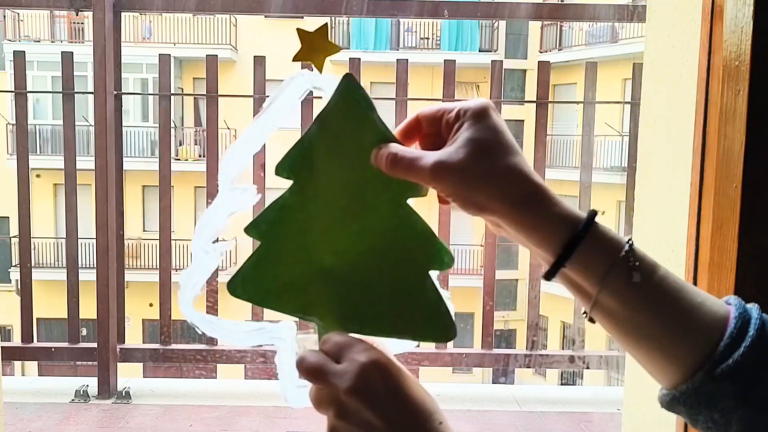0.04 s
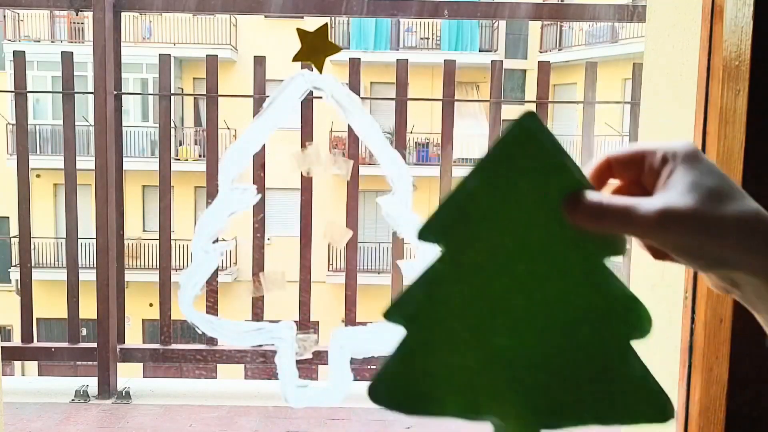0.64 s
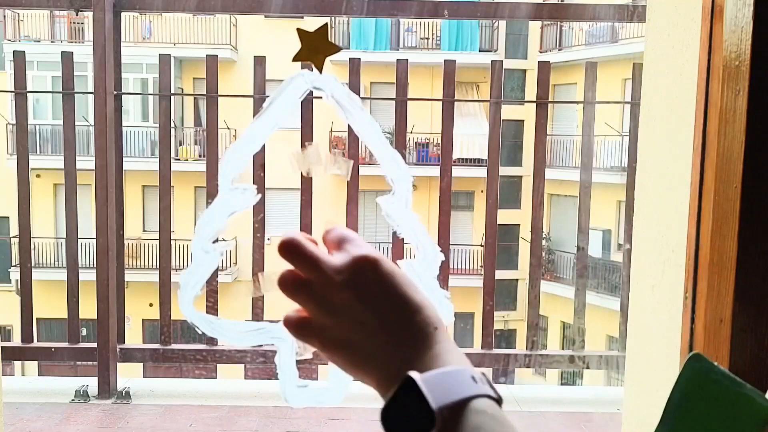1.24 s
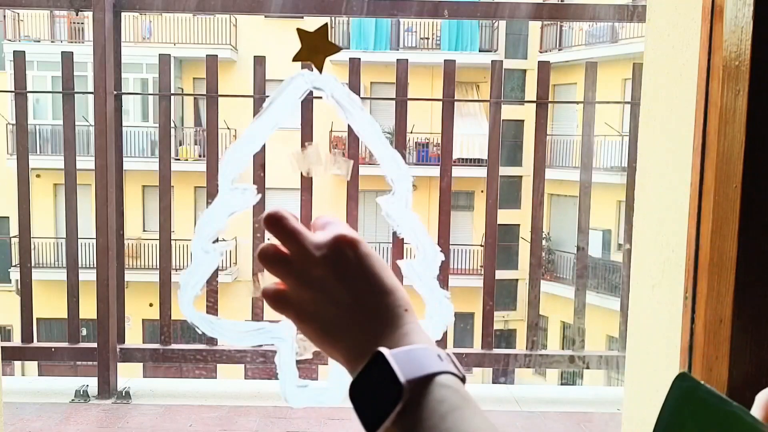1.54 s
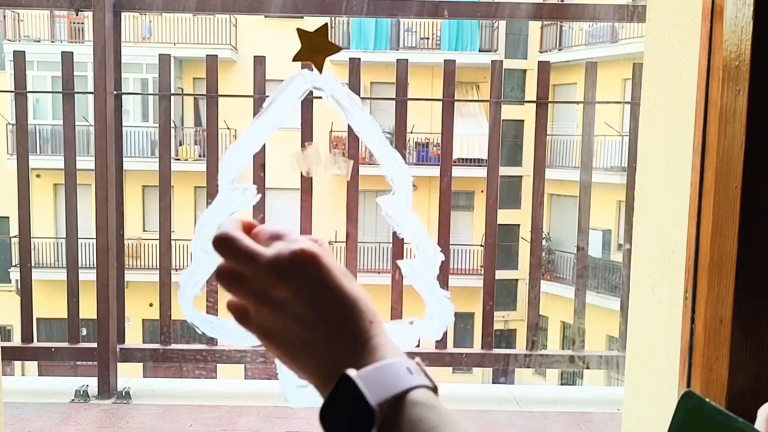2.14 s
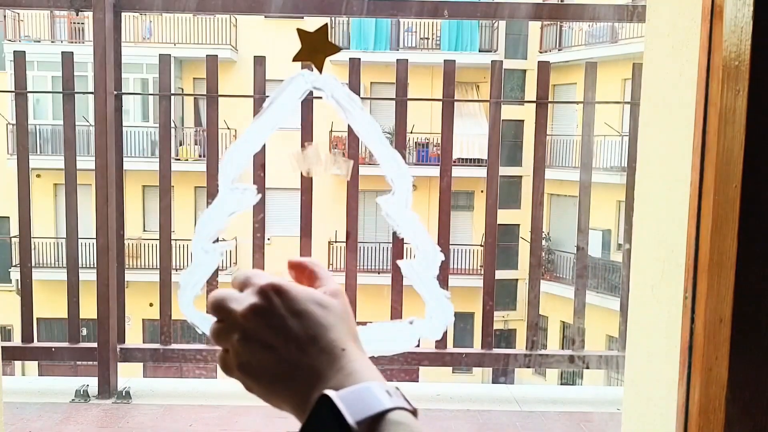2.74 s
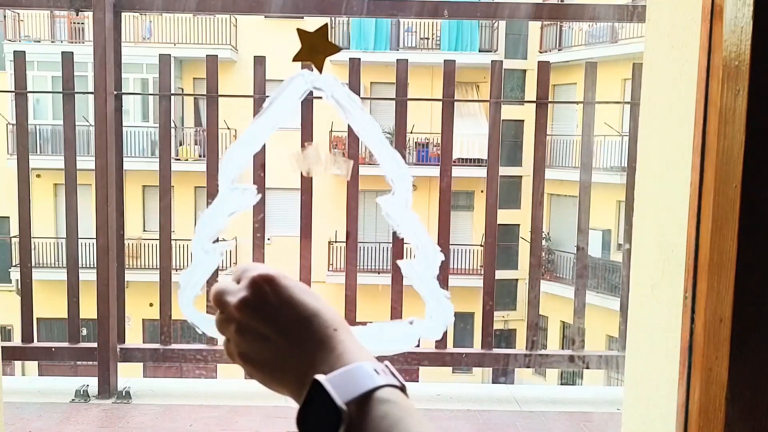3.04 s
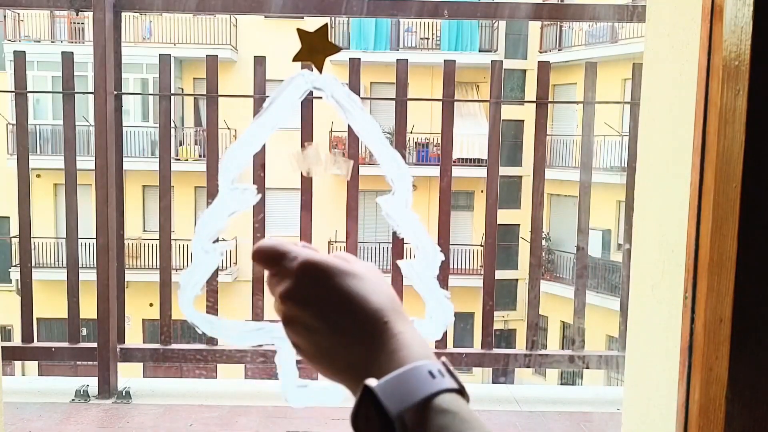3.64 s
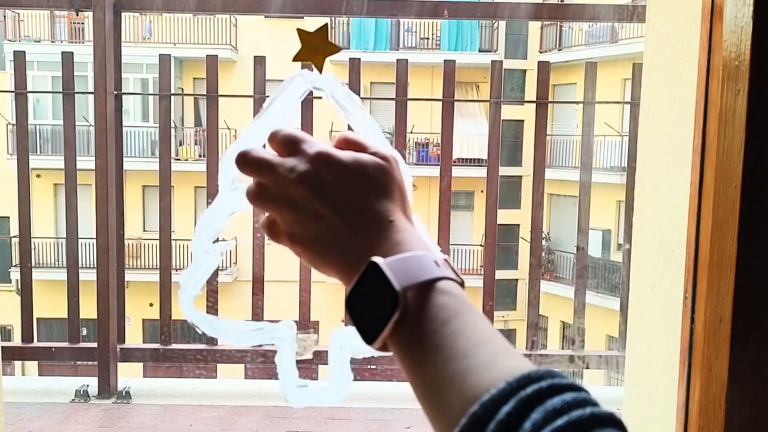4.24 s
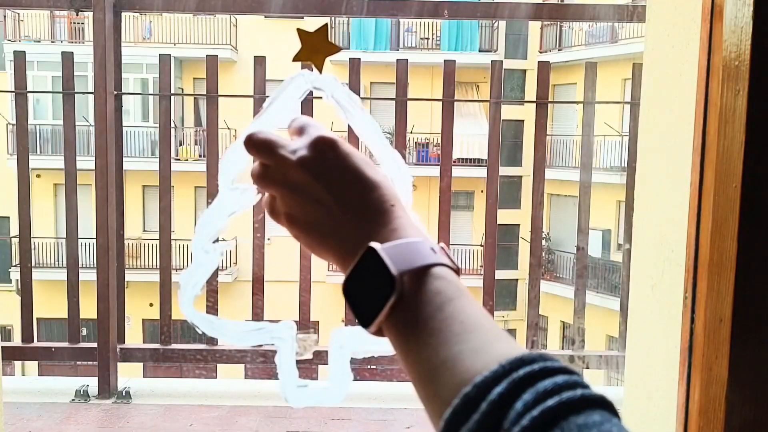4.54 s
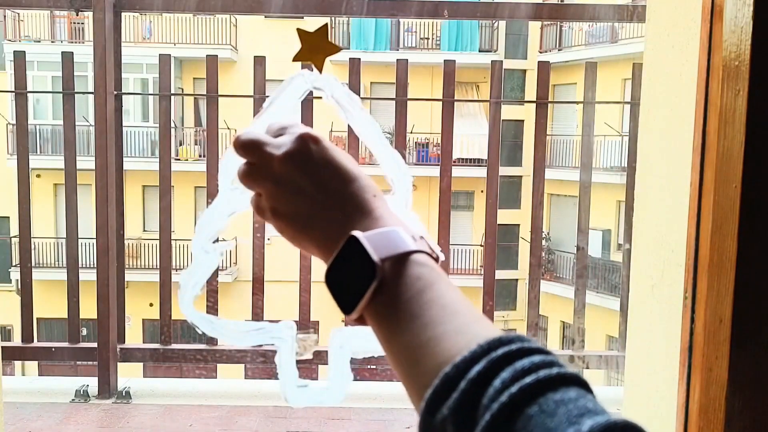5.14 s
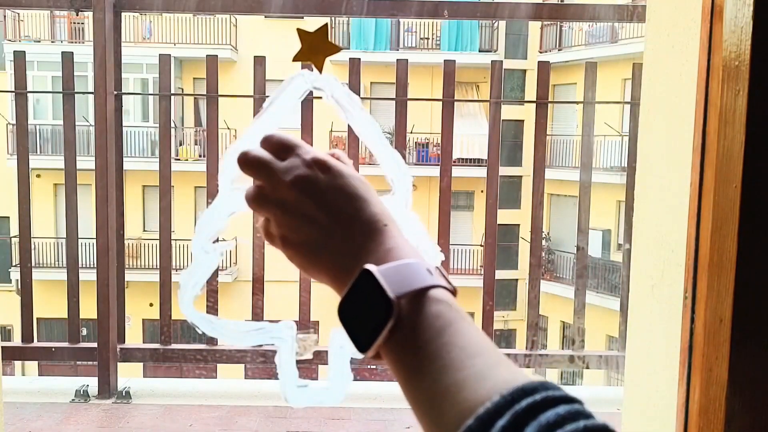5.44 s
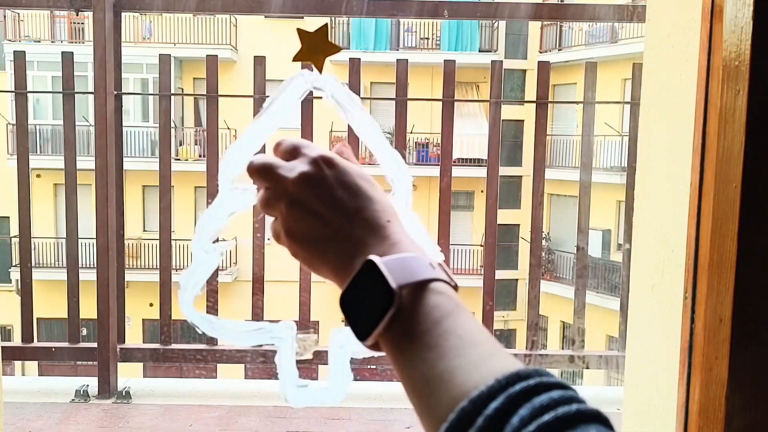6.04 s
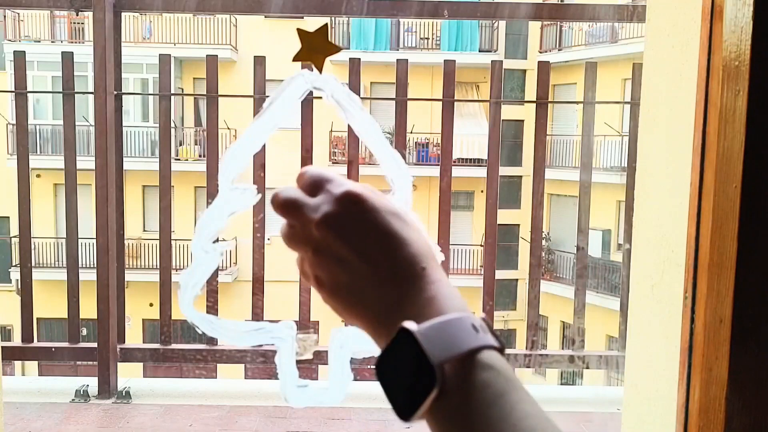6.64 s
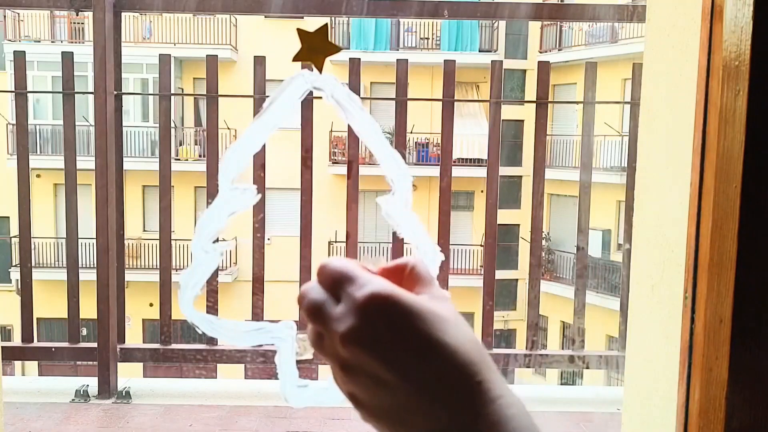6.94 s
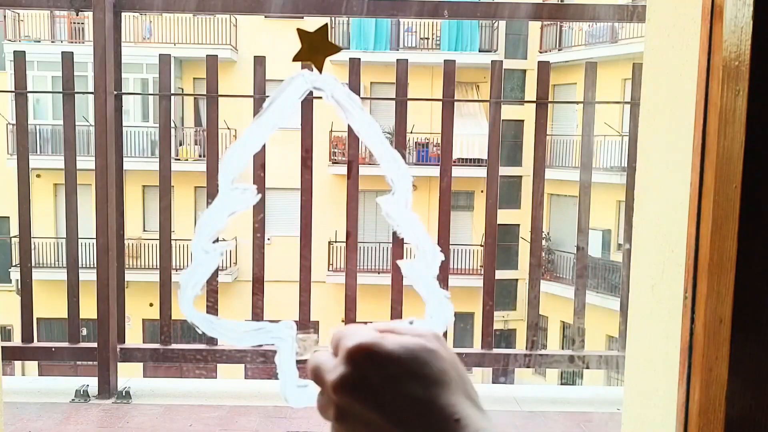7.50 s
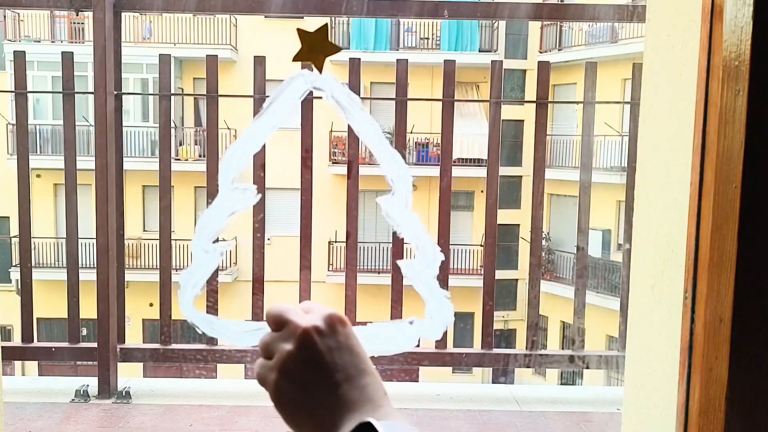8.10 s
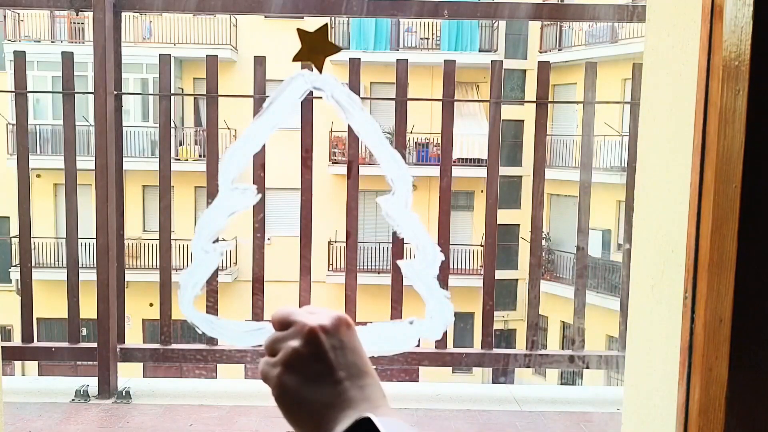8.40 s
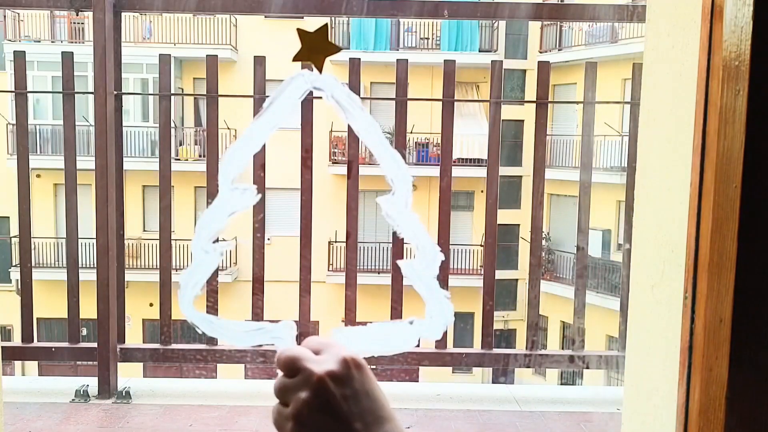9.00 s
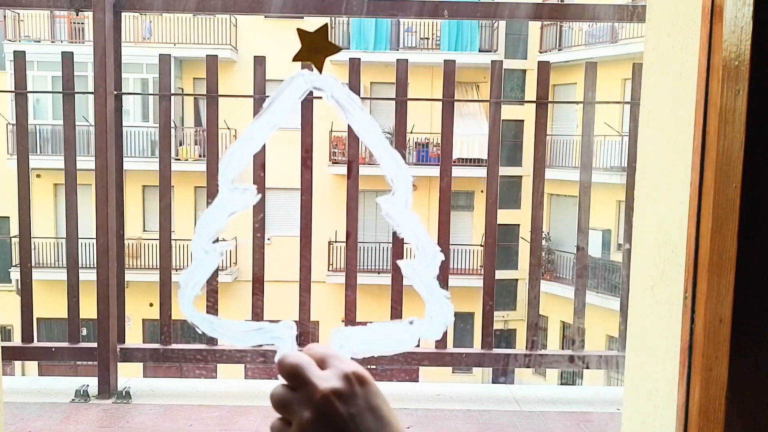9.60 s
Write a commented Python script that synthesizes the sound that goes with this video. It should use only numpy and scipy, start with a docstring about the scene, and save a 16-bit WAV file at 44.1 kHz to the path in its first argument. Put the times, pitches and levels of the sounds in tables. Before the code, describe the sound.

Sticky tape peeled off a window pane in short crackling rips that make the glass boom, with light crinkling in between.

```python
"""Sticky tape is peeled, strip by strip, off a large window pane where it held a paper cut-out.
The glue yields by stick-slip, in tiny slips and sharp pops that radiate from the taut tape as a hiss
and drive the bending modes of the glass, which boom for about a second. Between pulls a fingernail
buckles the next strip, loose tape crinkles, a fingertip judders and the cut-out is put aside.
A bare room reverberates over a faint hush."""
import sys
import numpy as np
from scipy import signal
from scipy.fft import rfft, irfft
from scipy.io import wavfile
from scipy.ndimage import uniform_filter1d

SR = 44100
rng = np.random.default_rng(int(sys.argv[2]) if len(sys.argv) > 2 else 0)


def unload_wav(signal):
    """Save mono or channel-first audio to the path in sys.argv[1] as 16-bit WAV at rate SR, clipped to [-1, 1]."""
    wavfile.write(
        sys.argv[1],
        SR,
        np.round(np.clip(np.atleast_2d(signal).T, -1, 1) * 32767).astype(np.int16),
    )


N = 430416
TIME = np.arange(N) / SR

# stretches of pulling on a strip: start_s, rise_s, hold_s, force_db, bright_share_db, rasp_db
PEEL_STROKES = [(0, 0.001, 0.034, -38.5, 15, -30.5), (.06, 0.028, 0.4, -52.5, 1, -49),
                (0.325, 0.018, 0.19, -28.5, -39, -68), (2.046, 0.0022, 0.082, -43.5, -29, -66),
                (2.172, 0.0035, 0.056, -20, -2, -37.5), (2.229, 0.012, 0.053, -19.5, -1, -54),
                (2.317, 0.018, 0.24, -25.5, -16.5, -49.5), (3.213, 0.044, 0.018, -34.5, 1, -29.5),
                (3.253, .1, 0.25, -33, -25, -58.5), (5.174, 0.064, 0.036, -37, -7, -24.5),
                (5.354, 0.0027, 0.049, -27, -3.5, -22.5), (5.412, 0.04, 0.3, -33.5, -18, -41),
                (6.376, 0.17, 0.13, -41, -31, -80), (6.557, 0.037, 0.0088, -24, -16.5, -40),
                (6.639, 0.036, 0.0075, -25, -42, -78), (8.575, .015, 0.045, -46, -10, -32),
                (8.632, 0.0035, 0.12, -32, -5, -27.5), (8.761, 0.033, .1, -28, 3, -24.5),
                (8.902, 0.021, .02, -17.5, -4, -41.5), (8.96, 0.02, 0.14, -29.5, -20, -47)]
# glue letting go in one pop: start_s, level_db, body_share_db
GLUE_POPS = [(0.0533, -23.5, -5.5), (0.0803, -19, -7.5), (0.1291, -16.5, -13.5), (0.214, -25, -6),
             (0.2608, -24.5, -4), (0.2998, -25, -7.5), (0.3401, -30, -10), (0.3444, -24.5, -6),
             (1.7462, -49.5, -17.5), (2.0382, -34, -8.5), (2.1768, -26, -2), (2.583, -39, -18),
             (2.7892, -34, -5), (2.9711, -38.5, -7.5), (3.196, -36, -20), (3.2166, -28, -25),
             (3.3947, -30, -22), (3.7703, -31.5, -15), (4.3508, -29.5, -15.5), (5.1334, -35.5, -27),
             (5.1956, -28.5, -32), (5.2309, -24, -28), (5.3543, -21.5, -6), (5.5872, -31.5, -14),
             (6.2183, -48.5, -14), (6.4323, -38.5, -31), (7.209, -30, -10.5), (7.2355, -25.5, -24),
             (7.424, -35, -18.5), (7.7694, -24, -5), (8.187, -45.5, -3.5), (8.5616, -30.5, -8.5),
             (8.5946, -22, -33), (8.6396, -14.5, -13.5), (8.6806, -13.5, -12.5), (8.7797, -11.5, -21.5)]
# spectral envelope of the pane's crowded modes: frequency_hz, density_db
PANE_SPECTRUM = [(45, -26.5), (105, -7), (140, -11.5), (190, -4.5), (290, -5), (450, -3), (950, -4.5),
                 (1350, -9.5), (2500, -10.5), (4000, -13), (6000, -20), (9000, -26), (16000, -38)]
# ring time of the pane: frequency_hz, t60_s
PANE_DECAY = [(60, 1.4), (160, 1.07), (300, 1.04), (700, 0.95), (1300, 0.98), (2900, 0.77), (7700, 0.42),
              (16000, 0.42)]
# radiation spectrum of taut tape: frequency_hz, density_db
TAUT_SPECTRUM = [(150, -33.5), (600, -29), (1500, -16.5), (4000, -11.5), (6000, -12), (8000, -8),
                 (10400, -4.5), (12700, -6.5), (14000, -6.5), (15200, 1), (16000, 1)]
# left-right likeness of a diffuse field: frequency_hz, coherence
DIFFUSE_COHERENCE = [(60, .9), (290, 0.92), (640, 0.15), (1400, -.2), (3000, -0.067), (16000, 0.1)]


def peeling_tape(pop_db=21.5, rasp_sag_db_per_s=79.5):
    """Membrane radiation: taut tape gives off the slips and pops of its glue as a bright rasp."""
    start, rise, hold, _, _, rasp_db = np.transpose(PEEL_STROKES)
    envelope = strokes(start, rise, hold, rasp_db, rasp_sag_db_per_s)
    rasp = envelope * stick_slip(per_s=600, spread_db=4.5, even_s=0.068)
    pops = bursts([(s, db) for s, db, _ in GLUE_POPS], t60=.012, rise_s=.0004)
    return colour(rasp + from_db(pop_db) * pops, TAUT_SPECTRUM)


def booming_pane(jolt_db=27, bright_hz=1300, force_sag_db_per_s=24, taut_margin_s=.008):
    """Forced vibration: tugging glue shakes the glass, and a fast rip reaches the high modes."""
    start, rise, hold, force_db, bright_db, _ = np.transpose(PEEL_STROKES)
    glue = stick_slip(per_s=1500, spread_db=4, even_s=0.048)
    force = glue * strokes(start, rise, hold, force_db, force_sag_db_per_s)
    edges = glue * strokes(start, rise, hold, force_db + bright_db, force_sag_db_per_s)
    # pops jolt the glass only while the tape is taut
    taut_from, taut_to = start - taut_margin_s, start + rise + hold + taut_margin_s
    taut_pops = [(s, db + body_db) for s, db, body_db in GLUE_POPS
                 if np.any((s > taut_from) & (s < taut_to))]
    jolts = from_db(jolt_db) * bursts(taut_pops, t60=0.0067)
    drive = low_pass(force + jolts, bright_hz) - high_pass(edges + jolts, bright_hz)
    first_flex = from_db(-9) * colour(drive, PANE_SPECTRUM)   # heard before the ring builds
    return moving_source(drive, pane_response, turns_per_s=3.0) + first_flex


def pane_response(modes_db=-10.5, crowd_db=-2.34):
    """Modal superposition: the glass rings with clear low modes under a crowd of close ones."""
    # lowest bending modes of the pane: pitch_hz, level_db
    low_modes = [(59.2, -7), (73.3, -17.5), (108.3, -5), (129.9, -11), (170.9, -3), (198.5, 0.5),
                 (229.5, -3.5), (245.6, 3), (267.8, -1), (285.3, -5), (300.1, -3), (311.6, -10),
                 (343.9, -4), (370.8, 2.5), (384.9, 1), (406.4, 2.5), (419.2, -4.5), (435.4, 4),
                 (450.9, -5), (502.7, -20.5), (520.2, -7.5), (551.8, -5), (580.7, -10.5), (600.9, -25.5),
                 (622.4, -13.5), (641.3, -5), (705.9, 1), (744.2, 0.5)]
    crowd = unit_energy(colour(dying_noise(PANE_DECAY), PANE_SPECTRUM))
    t, modes = TIME[:crowd.shape[1]], 0
    for hz, mode_db in low_modes:
        # higher modes reach left and right further out of step
        phase_gap = np.arccos(at_hz(DIFFUSE_COHERENCE, hz)) * rng.choice([-1, 1])
        phases = phase_gap / 2 * np.array([[1], [-1]])
        wave = rng.choice([-1, 1]) * np.sin(2 * np.pi * hz * t + phases)
        modes = modes + from_db(mode_db) * unit_energy(wave * decay(t, at_hz(PANE_DECAY, hz)))
    return from_db(modes_db) * unit_energy(modes) + from_db(crowd_db) * crowd


def crinkling_tape(crease_db=17.0, crease_t60=.016, pop_body_db=24.5, pop_ring_hz=3500):
    """Buckling and friction: tape ticks and clings to the fingers. Returns its sound and its flexing."""
    # tape buckling under the fingernail: start_s, level_db, ring_hz, treble_share_db
    creases = [(0.0024, -15, 3250, -27), (2.803, -27, 2870, -1), (3.5916, -32, 3980, -4),
               (3.915, -29.5, 2650, -5), (3.9328, -20.5, 3200, -7), (3.9806, -27, 3230, 5.5),
               (4.0114, -29, 3180, 5.5), (4.0393, -22, 3440, -1), (4.0556, -31, 3540, 10.5),
               (4.0624, -19.5, 3550, -22), (4.35, -32.5, 4660, -2), (5.648, -36, 3560, -4),
               (5.805, -41, 2710, -12), (5.9643, -38, 2800, -6), (6.0304, -31.5, 2780, -2),
               (6.1542, -38.5, 3040, -38), (6.8219, -39.5, 2720, -18), (6.9026, -33.5, 3280, -9),
               (7.1955, -35, 3040, -2), (7.5046, -26.5, 3180, 4), (7.563, -32.5, 3820, 6),
               (7.6031, -23.5, 2830, -1), (7.7865, -19.5, 4140, -7), (8.1534, -41.5, 4240, -8),
               (8.4324, -48, 4300, -17)]
    # loose tape rubbed between the fingers: start_s, rise_s, hold_s, level_db
    rustles = [(1.936, .01, 0.086, -70.5), (2.568, 0.014, .1, -57.5), (2.84, 0.016, .02, -51),
               (3.545, .012, 0.12, -52), (3.787, 0.022, 0.073, -52), (3.942, 0.11, 0.022, -37),
               (5.055, .01, .12, -65), (5.545, 0.043, 0.092, -52), (5.744, 0.0099, 0.29, -50),
               (6.3, 0.011, .12, -63.5), (6.811, 0.0065, 0.28, -65.5), (7.086, .02, 0.1, -49.5),
               (7.163, 0.029, 0.11, -51), (7.42, .005, 0.37, -49.5), (8.401, 0.019, 0.16, -69.5)]
    # radiation spectrum of slack tape: frequency_hz, density_db
    slack_spectrum = [(200, -27), (800, -18), (1300, -13), (2100, -7), (2700, 0), (3800, 0), (4600, -3.5),
                      (6300, -10.5), (10400, -6), (15200, -6.5)]
    start, level_db, ring_hz, treble_db = np.transpose(creases)
    grains = snaps(len(start), crease_t60, rise_s=0.0018)
    gains = from_db(level_db + crease_db)
    folds = [unit_energy(fold_resonance(grain, hz)) for hz, grain in zip(ring_hz, grains)]
    ticks = from_db(-2.5) * place(start, gains, folds)
    edges = from_db(2) * place(start, gains * from_db(treble_db), grains)
    pop_flexes = bursts([(s, db + body_db + pop_body_db) for s, db, body_db in GLUE_POPS], crease_t60)
    rub_envelope = strokes(*np.transpose(rustles), sag_db_per_s=7.5)
    rub = rub_envelope * stick_slip(per_s=450, spread_db=6, even_s=0.1)
    flexing = ticks + fold_resonance(pop_flexes, pop_ring_hz) + from_db(-4.5) * rub
    crackle = edges + from_db(3) * rub
    return colour(flexing, slack_spectrum) + colour(crackle, TAUT_SPECTRUM), flexing


def fold_resonance(snap, hz, width_hz=2100):
    """Damped resonance: a fold of tape rings in one broad, papery band."""
    return signal.lfilter(*signal.iirpeak(hz, hz / width_hz, fs=SR), snap + 1e-18)


def glass_sheen(flexing, gain_db=-11.5):
    """Radiation efficiency: thin glass radiates best near 3.5 kHz, so each tick leaves a sheen there."""
    # radiating band of the glass: frequency_hz, density_db
    band = [(1500, -28.5), (2300, -10), (2900, -3.0), (4100, -0.5), (5200, -20.5), (8000, -34.5)]
    ring = unit_energy(colour(dying_noise(PANE_DECAY), band))
    return from_db(gain_db) * through(flexing, ring)


def fingertip_judder(pitch_hz=172):
    """Periodic stick-slip: a pressing fingertip makes the glass hum."""
    # swell of the hum, one curve per press: time_s, level_db
    presses = [
        [(6.36, -76), (6.455, -47.5), (6.49, -60), (6.55, -40), (6.62, -46.5), (7.42, -81)],
    ]
    return gain_curve(presses) * np.sin(2 * np.pi * pitch_hz * TIME)


def handling():
    """Air flow, friction and impact: the cut-out swishes and knocks, and the hand brushes the glass."""
    # the cut-out carried through the air, one curve per movement: time_s, level_db
    swishes = [
        [(.7, -83), (.92, -101), (1.0, -70.5), (1.12, -67.5), (1.3, -77), (1.6, -124)],
    ]
    # hand and arm brushing past the glass, one curve per movement: time_s, level_db
    brushes = [
        [(.7, -77), (.92, -59.5), (1.1, -68.5), (1.3, -71), (1.55, -69), (1.9, -75.5)],
        [(2.7, -48), (2.95, -61.5), (3.15, -61)],
        [(7.2, -57.5), (7.45, -68.5), (7.6, -63), (7.8, -84)],
    ]
    # soft knocks as the cut-out is put aside: start_s, level_db
    knocks = [(.856, -19), (.873, -41), (.922, -31), (.95, -28)]
    # spectra of the dull knock, the swish and the brush: frequency_hz, density_db
    knock_spectrum = [(150, -27), (500, -0.5), (850, 2), (1500, -19), (3000, -29), (8000, -48)]
    swish_spectrum = [(400, 8), (2800, 6.5), (4200, 2), (6500, -13), (15000, -5)]
    brush_spectrum = [(60, -14.5), (280, -1), (800, -12.5), (1500, -21.0), (6000, -49)]
    swish = gain_curve(swishes) * colour(rng.standard_normal(N), swish_spectrum)
    friction = stick_slip(per_s=150, spread_db=1.0, even_s=0.059)
    brush = gain_curve(brushes) * colour(friction, brush_spectrum)
    return swish + brush + colour(bursts(knocks, t60=0.026), knock_spectrum)


def room_response(tail_db=-0.5, direct_db=-10, lean_db=0.73, lean_hz=7000):
    """Reverberation: direct sound, quick reflections from glass and frame, then the tail of bare walls."""
    # reverberation time of the room: frequency_hz, t60_s
    room_decay = [(200, 0.22), (1500, 0.3), (3900, 0.65), (7000, 0.5), (11000, .36), (16000, 0.34)]
    response = from_db(tail_db) * dying_noise(room_decay)
    reflections = snaps(count=2, t60=.022, rise_s=.0003)
    response[:, :reflections.shape[1]] += reflections
    response[[0, 1], [0, 4]] += from_db(direct_db)   # arrives four samples later on the right
    # the left side faces the tape and catches more of its treble
    dull = low_pass(response, lean_hz, order=1)
    return dull + (response - dull) * from_db([[lean_db], [-lean_db]])


def room_hush(level_db=-70.5):
    """Ambient noise: a faint, steady diffuse field fills the room."""
    # spectrum of the background: frequency_hz, density_db
    hush_spectrum = [(18, -47), (30, -24.5), (245, -15.5), (584, -18), (1250, -19), (1390, -26.5),
                     (1500, -22.5), (3770, -26.5), (6210, -41), (7270, -36), (9460, -46.5), (10800, -36),
                     (16000, -35.5)]
    return from_db(level_db) * colour(diffuse_noise(N), hush_spectrum)


def stick_slip(per_s, spread_db, even_s):
    """Stick-slip: random clicks of very uneven size, whose mean power the steady pull holds at one."""
    sizes = from_db(spread_db * np.minimum(rng.exponential(1, N), 4)) * rng.choice([-1, 1], N)
    clicks = sizes * (rng.random(N) < per_s / SR)
    mean_power = uniform_filter1d(clicks ** 2, int(even_s * SR))
    return clicks / np.sqrt(np.maximum(mean_power, 1 / SR))


def strokes(starts, rises, holds, levels_db, sag_db_per_s, let_go_db_per_s=451):
    """Incoherent addition: hand movements build, sag while held and let go, and their powers add."""
    power = np.zeros(N)
    for start, rise, hold, level_db in zip(starts, rises, holds, levels_db):
        first = max(int(start * SR), 0)
        t = TIME[:min(SR, N - first)]
        sag_db = sag_db_per_s * np.maximum(t - rise, 0)
        let_go_db = let_go_db_per_s * np.maximum(t - rise - hold, 0)
        gain = np.minimum(t / rise, 1) ** 2 * from_db(level_db - sag_db - let_go_db)
        power[first:first + len(t)] += gain ** 2
    return np.sqrt(power)


def snaps(count, t60, rise_s, size=4096):
    """Avalanches of micro-clicks, one per row: each swells, dies and has no pitch of its own."""
    envelope = (1 - np.exp(-TIME[:size] / rise_s)) * decay(TIME[:size], t60)
    grains = rng.laplace(size=(count, size)) * envelope
    whitened = irfft(np.exp(1j * np.angle(rfft(grains))))
    grains = whitened * envelope ** 0.25
    return grains / np.linalg.norm(grains, axis=1, keepdims=True)


def bursts(rows, t60, rise_s=0.00092):
    """Impulsive excitation: one snap for each row of start_s, level_db."""
    start, level_db = np.transpose(rows)
    return place(start, from_db(level_db), snaps(len(start), t60, rise_s))


def moving_source(x, response, turns_per_s):
    """Transfer depends on position: a travelling source meets a changing blend of two responses."""
    angle = 2 * np.pi * turns_per_s * TIME
    return through(x * np.cos(angle), response()) + through(x * np.sin(angle), response())


def dying_noise(t60s, size=49152):
    """Modal overlap: countless close modes merge into noise, each band dying at its own rate."""
    white, hz, ring = rfft(diffuse_noise(size)), np.fft.rfftfreq(size, 1 / SR), 0
    edges = np.append(0, np.geomspace(130, SR / 2, 15))
    for low, high in zip(edges, edges[1:]):
        t60 = at_hz(t60s, (low + high) / 2)
        band = irfft(white * ((hz >= low) & (hz < high))) * decay(TIME[:size], t60)
        ring = ring + unit_energy(band) * np.sqrt(high - low)   # equal energy per Hz
    return unit_energy(ring)


def diffuse_noise(size):
    """Spatial coherence: diffuse white noise is alike left and right in the bass, unrelated higher up."""
    mid, side = rfft(rng.standard_normal((2, size)))
    alike = at_hz(DIFFUSE_COHERENCE, np.fft.rfftfreq(size, 1 / SR))
    return irfft(np.sqrt((1 + alike) / 2) * mid + np.sqrt((1 - alike) / 2) * side * [[1], [-1]], size)


def colour(x, spectrum, size=2048):
    """Minimum-phase filtering: causal shaping that keeps the power of white noise."""
    magnitude = from_db(at_hz(spectrum, np.fft.rfftfreq(size, 1 / SR)))
    cepstrum = irfft(np.log(magnitude))
    cepstrum[1:size // 2] *= 2
    cepstrum[size // 2 + 1:] = 0
    return through(x, unit_energy(irfft(np.exp(rfft(cepstrum)))))


def through(x, response):
    """Convolution with an impulse response."""
    return signal.oaconvolve(np.atleast_2d(x), np.atleast_2d(response), axes=-1)[:, :x.shape[-1]]


def place(times, gains, grains):
    """Superposition of short sounds, each at its own time."""
    track = np.zeros(N + SR)
    for s, gain, grain in zip(times, gains, grains):
        start = max(int(s * SR), 0)
        track[start:start + len(grain)] += gain * grain
    return track[:N]


def gain_curve(spans):
    """Amplitude envelope from curves of time_s, level_db, silent between them."""
    return sum(from_db(np.interp(TIME, *np.transpose(rows), left=-np.inf, right=-np.inf))
               for rows in spans)


def at_hz(points, hz):
    """Interpolation of a table along log frequency."""
    frequencies, values = np.transpose(points)
    return np.interp(np.log(np.maximum(hz, 1)), np.log(frequencies), values)


def decay(t, t60):
    """Exponential damping by 60 dB in t60 seconds."""
    return np.exp(-np.log(1000) * t / t60)


def low_pass(x, hz, order=2):
    return signal.sosfilt(signal.butter(order, hz, fs=SR, output="sos"), x)


def high_pass(x, hz):
    return signal.sosfilt(signal.butter(2, hz, "high", fs=SR, output="sos"), x)


def unit_energy(x):
    return x / np.sqrt(np.mean(np.sum(x ** 2, axis=-1)))


def from_db(db):
    return 10 ** (np.asarray(db) / 20)


def scene():
    """Superposition: tape and hand sound through the room; the pane radiates straight to the listener."""
    crinkle, flexing = crinkling_tape()
    sheen = glass_sheen(flexing)
    hush = room_hush()
    glass = booming_pane() + fingertip_judder() + sheen
    tape_and_hand = peeling_tape() + crinkle + handling()
    return glass + moving_source(tape_and_hand, room_response, turns_per_s=2.1) + hush


def record(dry):
    """Band limiting: the deep bass and the top of the treble are cut."""
    bass_hz, top_hz = 55, 15900
    steep_low_pass = signal.ellip(12, .2, 80, top_hz, fs=SR, output="sos")
    return signal.sosfilt(steep_low_pass, high_pass(dry, bass_hz))


dry = scene()
out = record(dry)
unload_wav(out)
```